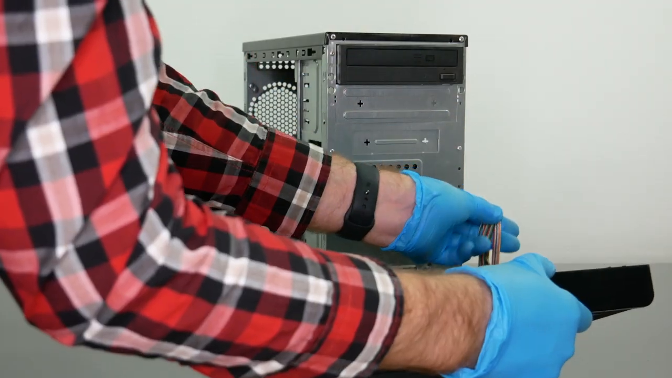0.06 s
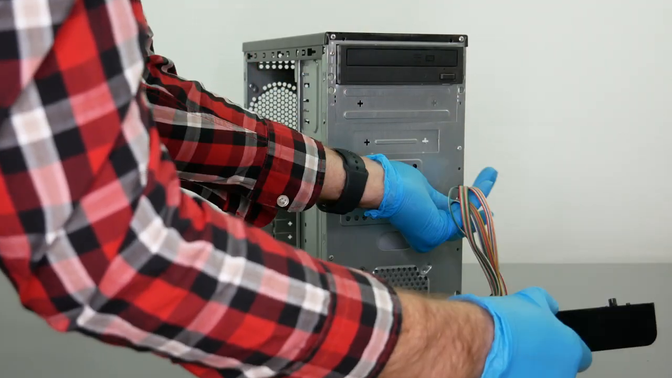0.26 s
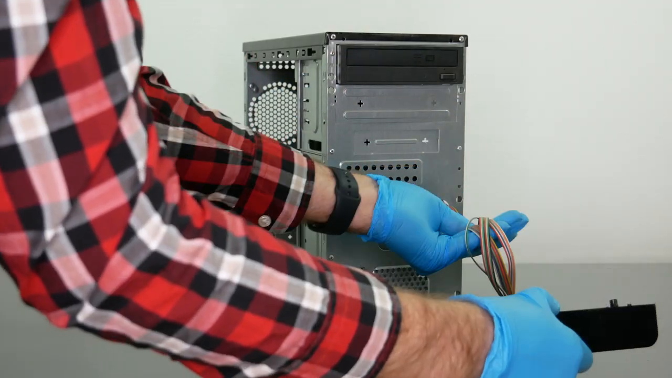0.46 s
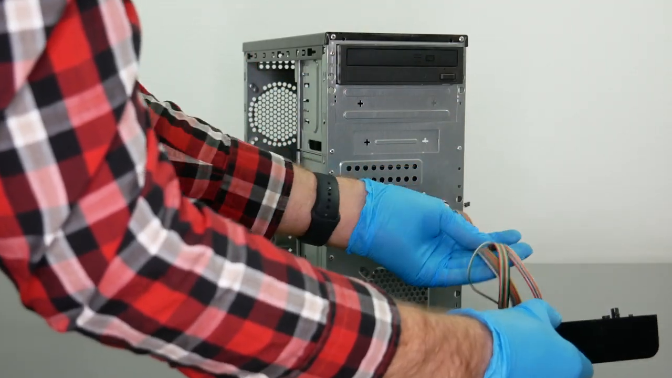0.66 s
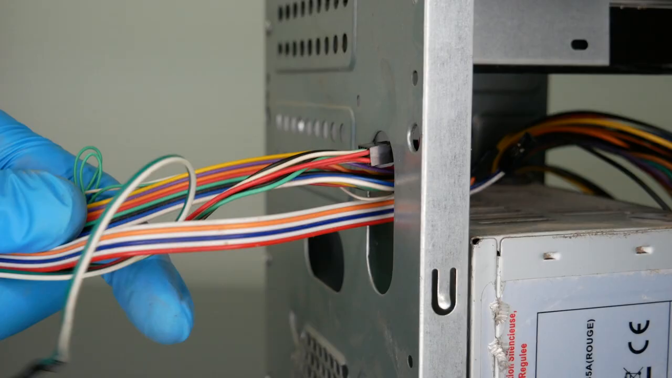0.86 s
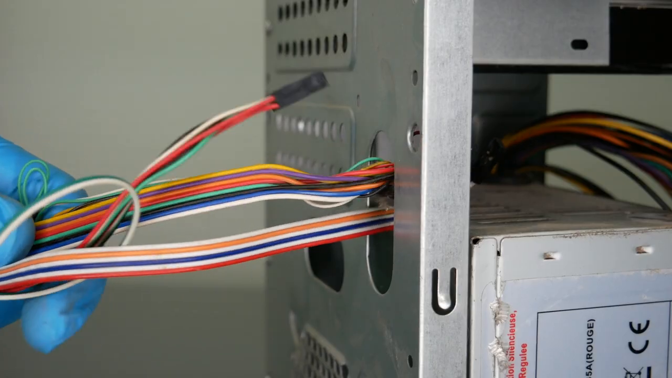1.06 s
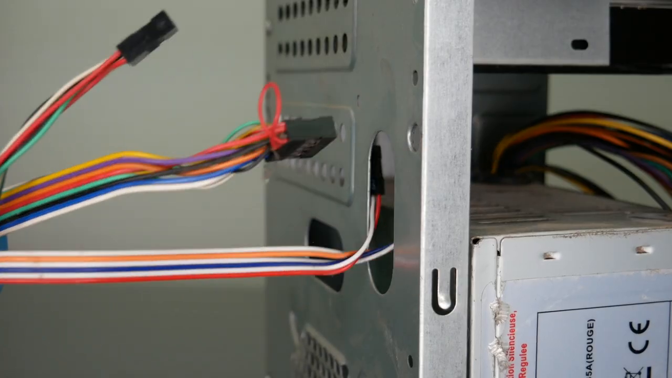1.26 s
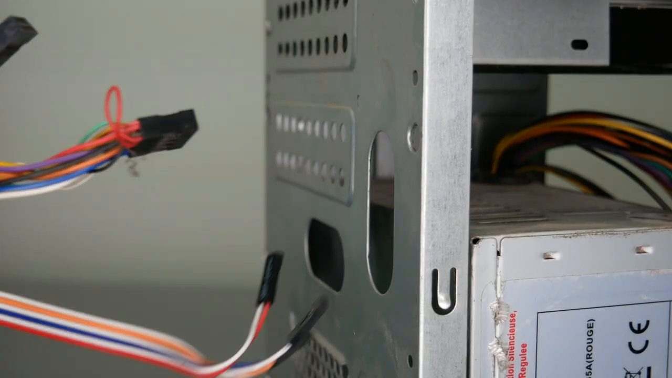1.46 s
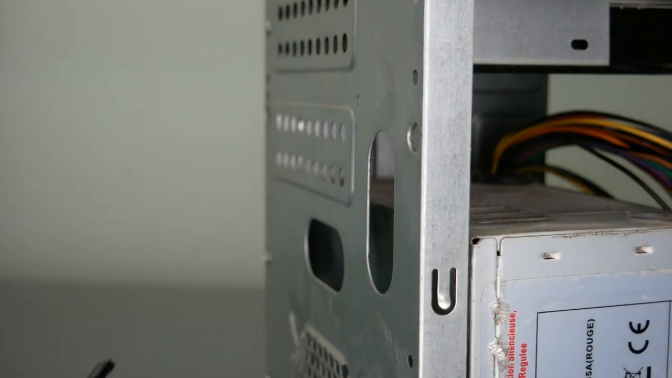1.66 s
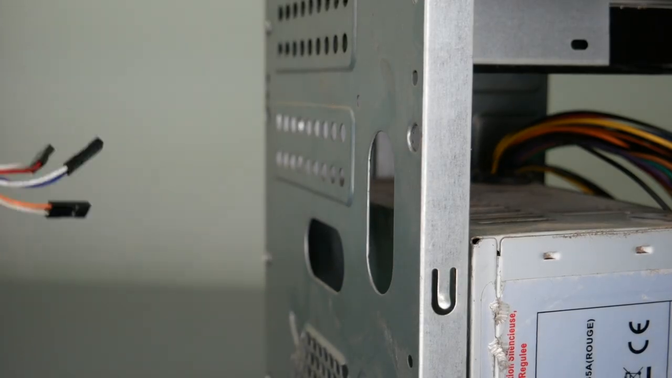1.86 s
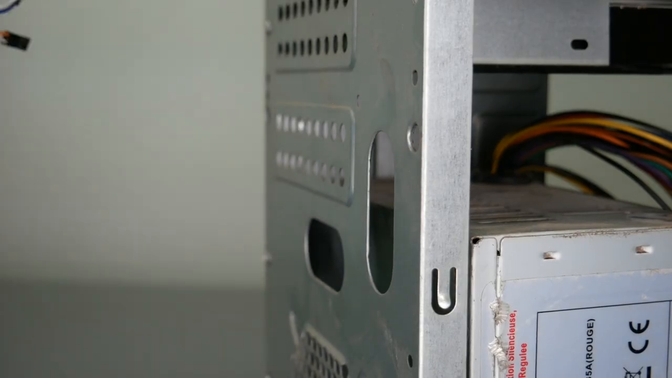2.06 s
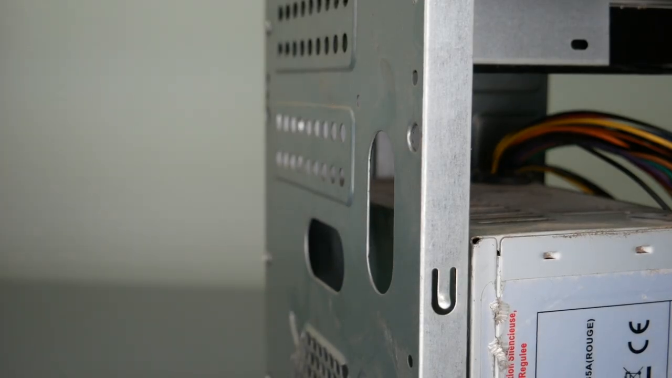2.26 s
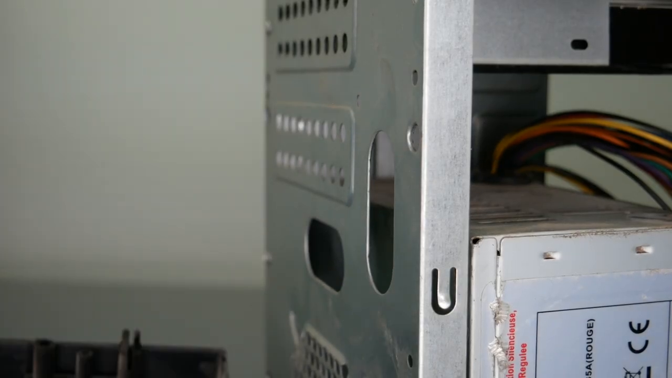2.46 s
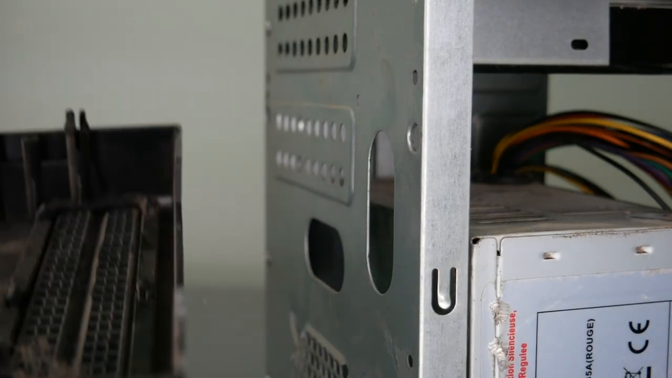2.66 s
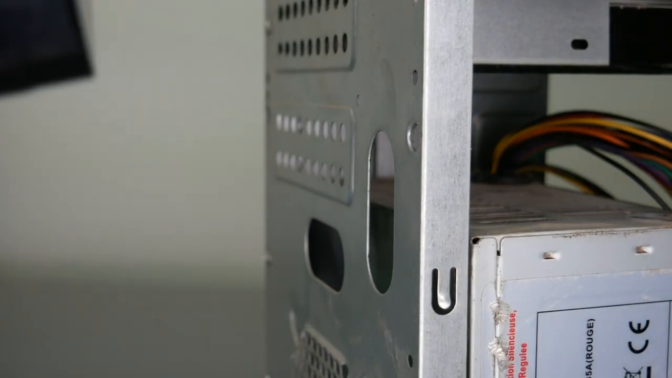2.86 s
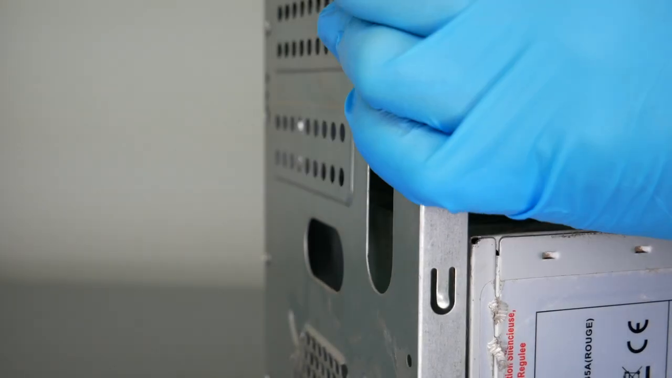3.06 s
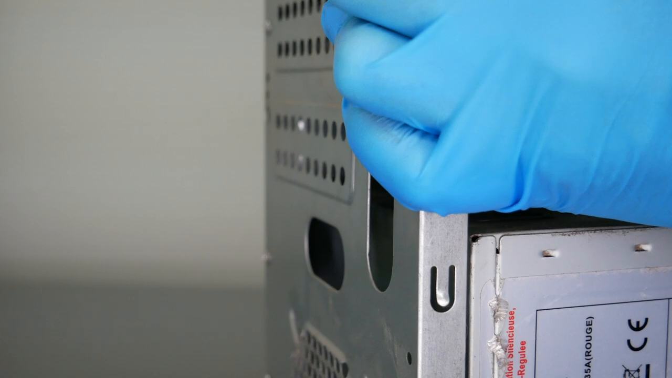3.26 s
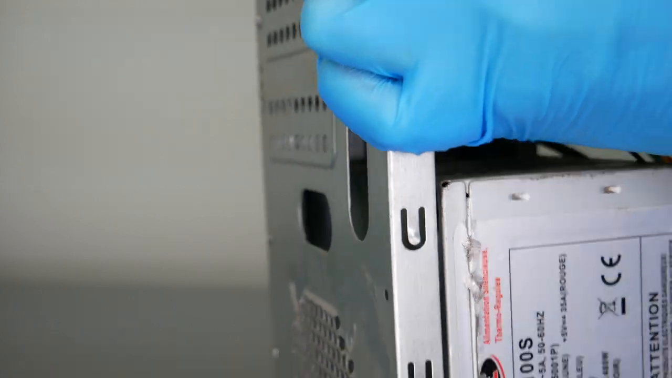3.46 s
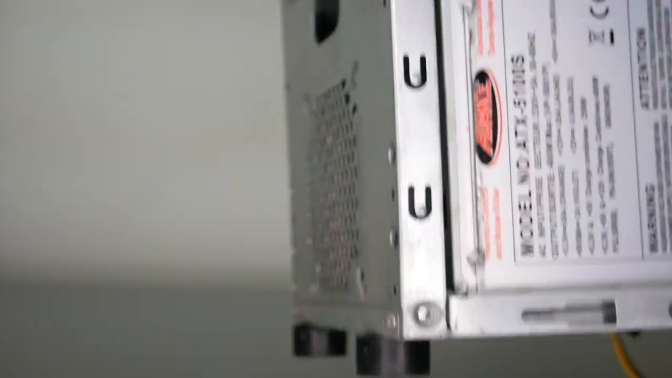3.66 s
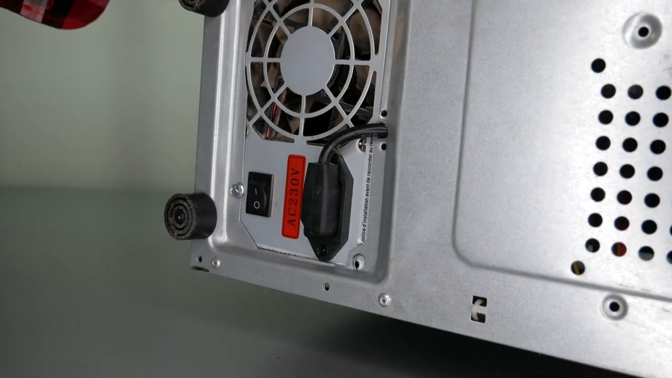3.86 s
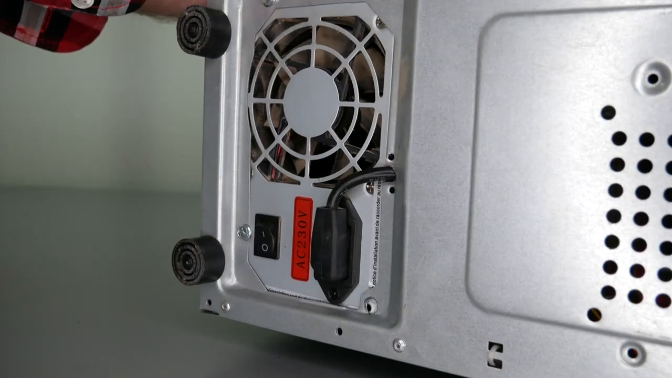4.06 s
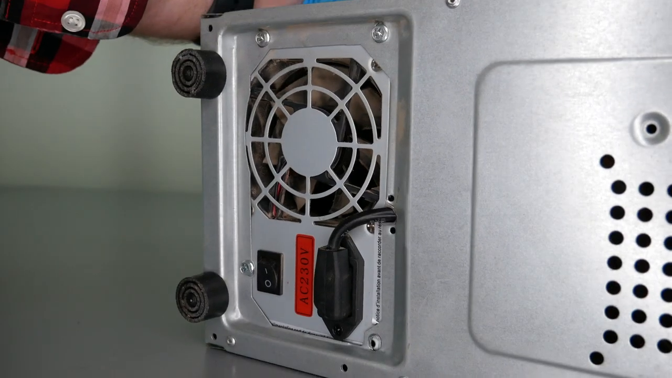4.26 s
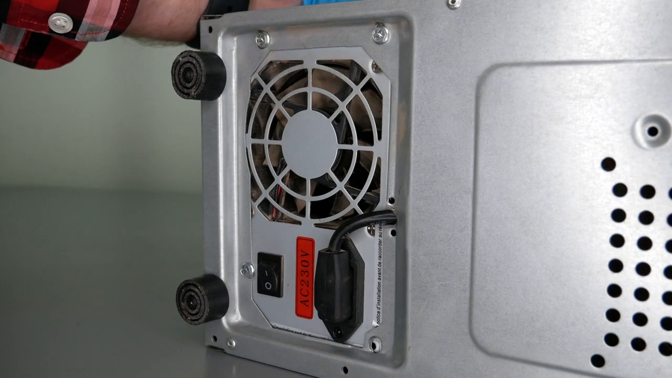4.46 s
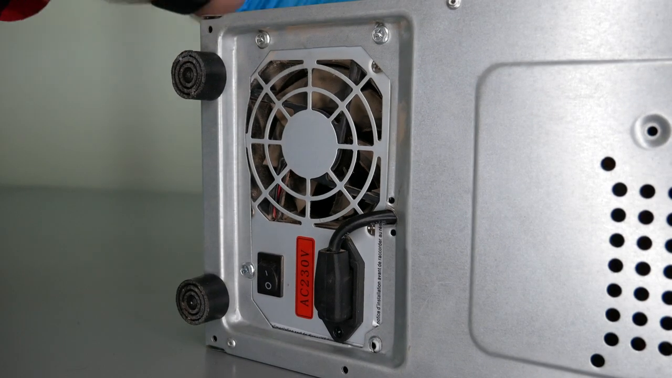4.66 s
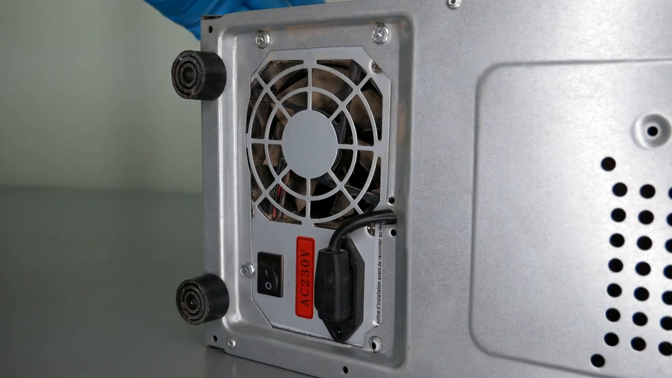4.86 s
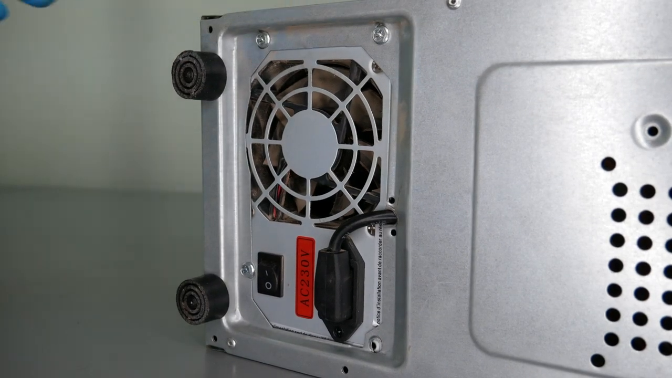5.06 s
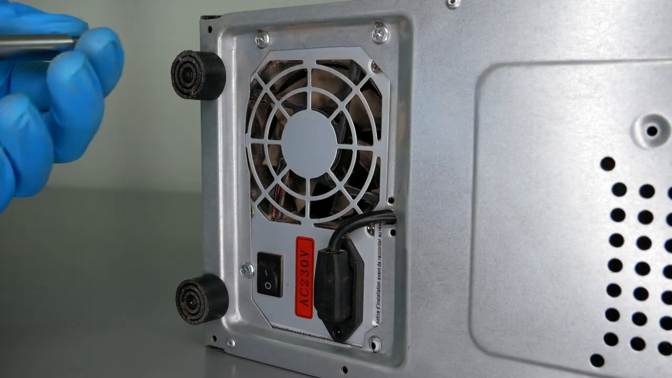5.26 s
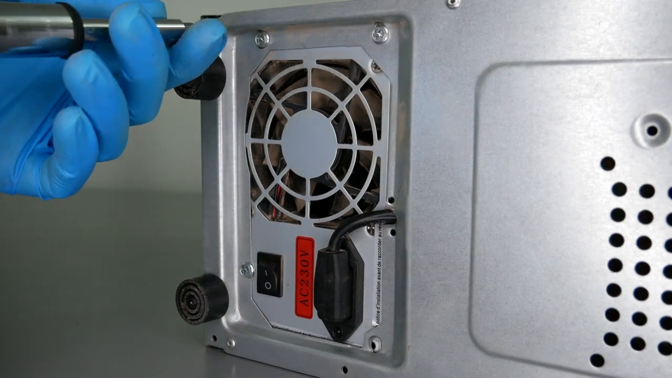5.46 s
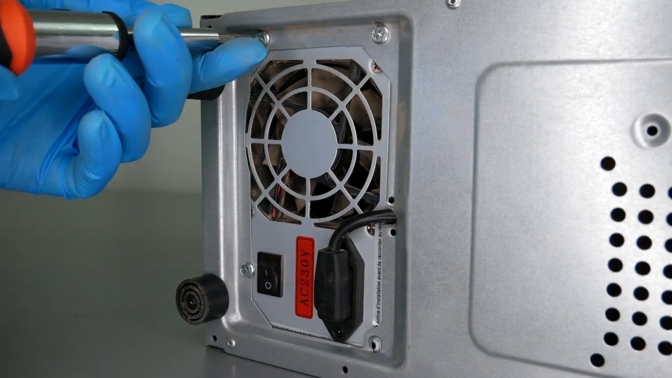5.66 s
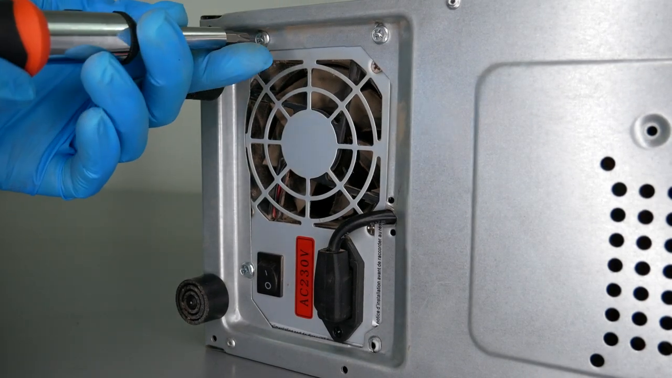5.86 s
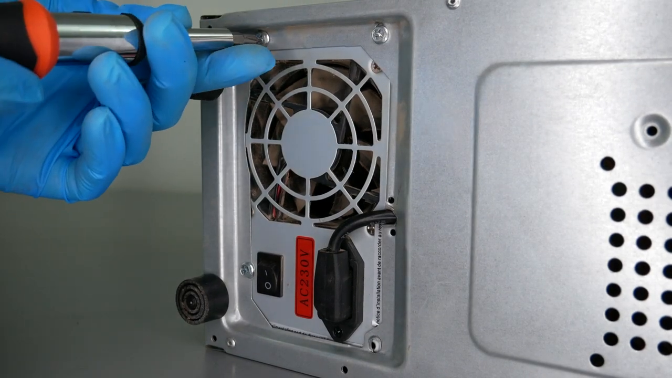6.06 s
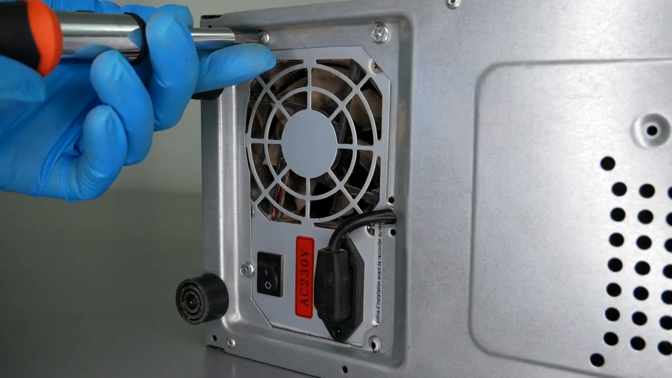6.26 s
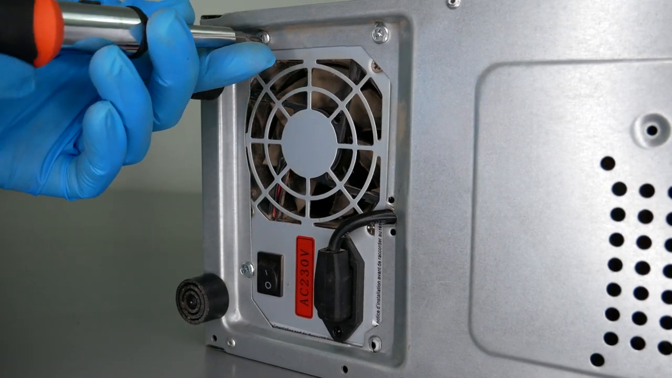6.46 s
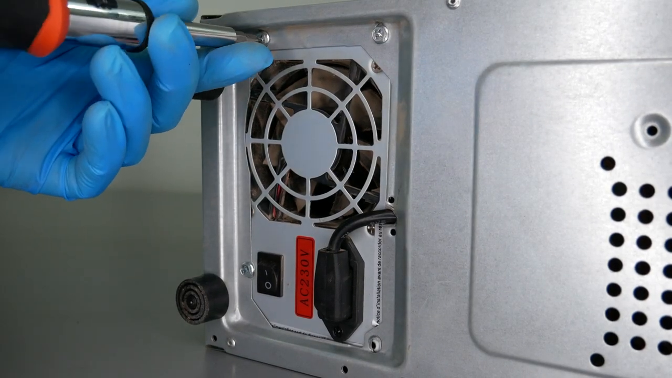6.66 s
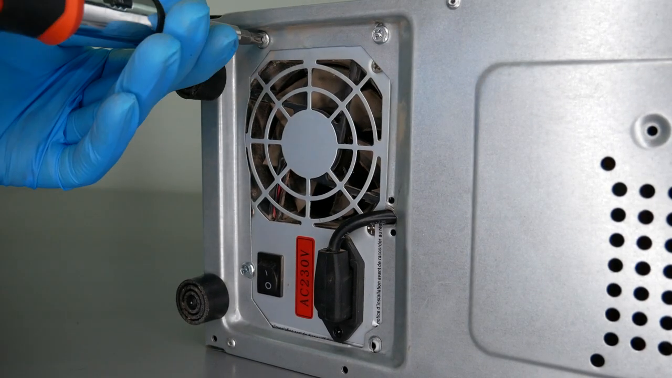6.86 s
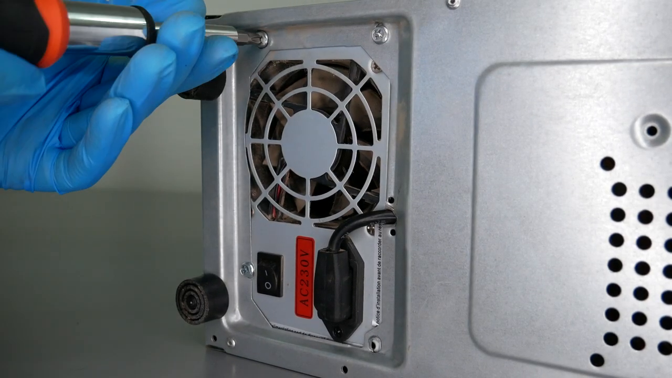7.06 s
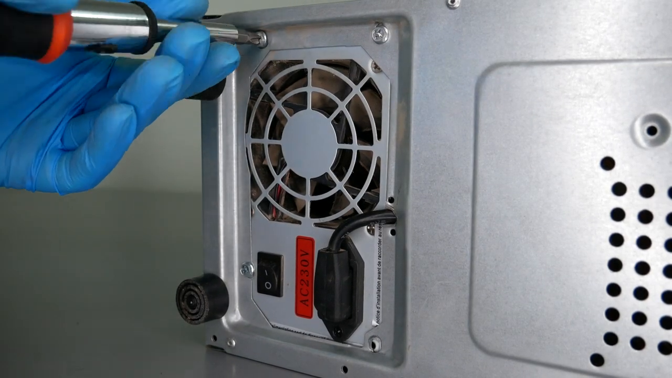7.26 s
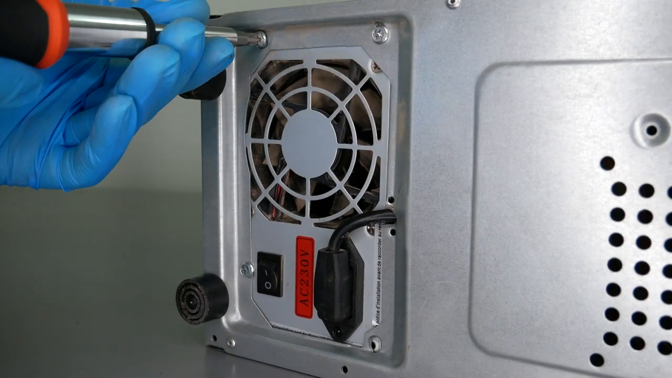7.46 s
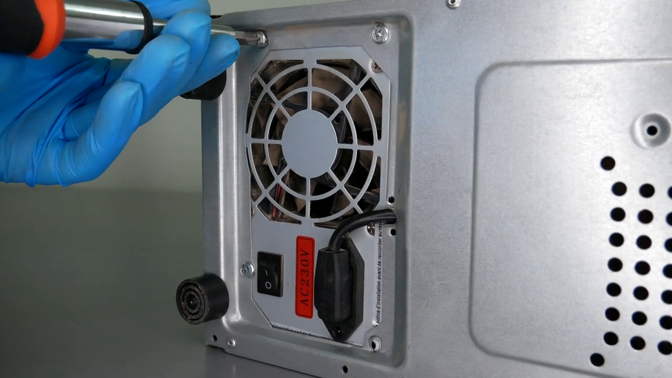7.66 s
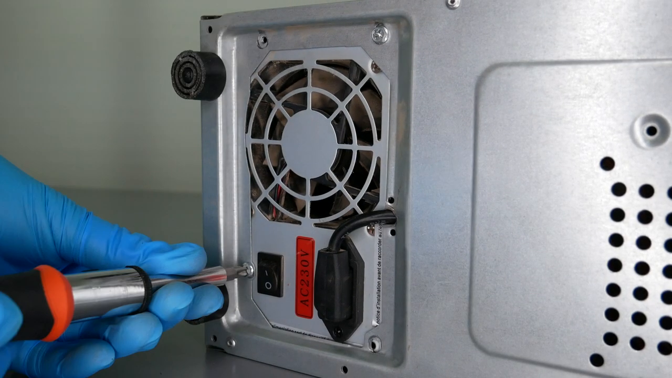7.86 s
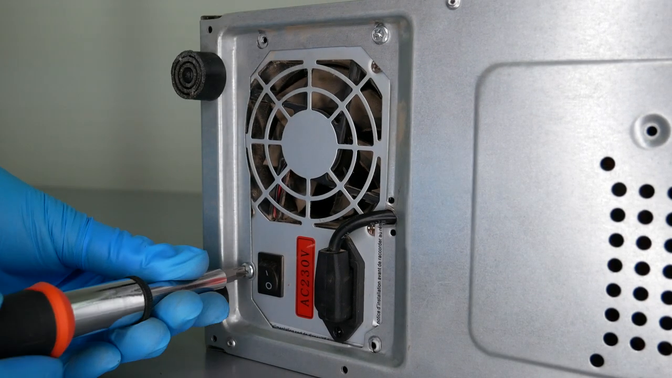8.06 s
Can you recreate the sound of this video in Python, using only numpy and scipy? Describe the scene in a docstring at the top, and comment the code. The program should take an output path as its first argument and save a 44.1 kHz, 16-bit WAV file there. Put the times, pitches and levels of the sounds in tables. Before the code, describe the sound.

Wires and plugs scrape and clatter through a thin steel computer case, which thuds down and rocks, then a screwdriver rasps and ticks over low hum.

```python
"""At a table, a steel computer case is worked on. Wires drag through it in tiny random slips, and plugs clatter
as bursts of contacts that ring the sheet. Blows ring the case's low panels, rubber squeaks in gliding tones, and
the case skids and rocks in a slow sway. Then a screwdriver turns with gritty rasps, sharp ticks and a grinding
shaft. Mains hum is made of sine tones; hiss, swishes and a low murmur are shaped noise."""
import sys
import numpy as np
from scipy import signal
from scipy.fft import rfft, irfft, next_fast_len
from scipy.io import wavfile
from scipy.ndimage import uniform_filter1d, map_coordinates

SR = 44100
rng = np.random.default_rng(int(sys.argv[2]) if len(sys.argv) > 2 else 0)


def wav_record(signal):
    """Record a signal, one row per channel, as 16-bit PCM in the file named by sys.argv[1]."""
    frames = np.transpose(np.atleast_2d(signal))
    bounded = np.clip(frames, -1, 1)
    # unit amplitude maps onto the largest positive 16-bit level
    quanta = np.round(bounded * 32767).astype(np.int16)
    wavfile.write(sys.argv[1], SR, quanta)


N = 358091

# screwdriver turns: start_s, length_s (how fast the rasp fades), level_db (relative)
TURNS = [(6.855, 0.078, -30), (7.034, 0.029, -28), (7.21, 0.024, -31), (7.3584, 0.032, -27.5),
         (7.504, 0.031, -26.5), (7.665, 0.03, -30), (7.812, 0.015, -24.5), (7.898, 0.025, -23.5),
         (8.055, 0.034, -29)]


def amp(db):
    """Turn decibels into gain."""
    return 10 ** (np.asarray(db) / 20)


def unit(x):
    """Scale to an rms of 1."""
    return x / np.sqrt(np.mean(x ** 2) + 1e-20)


def along(points, hz):
    """Read a curve of (Hz, value) points on a log frequency axis."""
    point_hz, values = np.transpose(points)
    return np.interp(np.log(hz + 1), np.log(point_hz + 1), values)


def wobble(rate):
    """A smooth random curve with this many random points a second."""
    points = rng.standard_normal(int(N * rate / SR) + 4)
    return map_coordinates(points, [np.arange(N) * rate / SR])


def filtered(x, response):
    """Multiply the spectrum of x by a complex response of frequency."""
    size = 2 * next_fast_len(x.shape[-1] // 2 + 4096)
    spectrum = rfft(x, size) * response(np.fft.rfftfreq(size, 1 / SR))
    return irfft(spectrum, size)[..., :x.shape[-1]]


def coloured(x, spectrum):
    """Filter with a (Hz, dB) shape of unit power, with no sound before its cause."""
    def response(hz):
        shape = unit(amp(along(spectrum, hz)))
        # folding the cepstrum forward makes the filter causal
        cepstrum = irfft(np.log(shape + 1e-6))
        half = len(cepstrum) // 2
        cepstrum[1:half] *= 2
        cepstrum[half + 1:] = 0
        return np.exp(rfft(cepstrum))
    return filtered(x, response)


def resonate(x, peaks):
    """Pass x through resonances of (pitch Hz, width Hz, dB), with alternating signs."""
    def response(hz):
        total = 0
        for k, (centre, width, db) in enumerate(peaks):
            drag = 1j * hz * width
            total = total + (-1) ** k * amp(db) * drag / (centre * centre - hz * hz + drag)
        return total
    return filtered(x, response)


def ring(t60, direct):
    """A contact, then a dense ring; the two together have unit energy, and the high treble dies first."""
    # how long each pitch rings: pitch_hz, relative ring time (a ratio)
    damping = [(150, 0.83), (700, 0.87), (2500, 0.9), (12000, 0.6)]
    hz, t, noise = signal.stft(rng.standard_normal(SR * 3 // 4), SR, nperseg=256)
    ring_s = max(t60, .02) * along(damping, hz)[:, None]
    tail = signal.istft(noise * amp(-60 * t / ring_s), SR, nperseg=256)[1]
    tail /= np.linalg.norm(tail)
    tail[0] += direct
    return tail / np.hypot(1, direct)


def grains(size, rate, spread_db):
    """Tiny slips of random size and sign at random moments, rate a second."""
    happens = rng.random(size) < rate / SR
    return happens * amp(spread_db * rng.standard_normal(size)) * rng.choice([-1, 1], size)


def note(db, hz, t60, split=0.037):
    """Seven close tones that beat together as they die; split is their relative spacing."""
    t = np.arange(SR // 2) / SR
    steps = np.arange(-3, 4) + rng.uniform(-.4, .4, size=7)
    phases = 2 * np.pi * (hz * (1 + split * steps[:, None]) * t + rng.random((7, 1)))
    cluster = unit(amp(-3 * np.abs(steps)) @ np.sin(phases))
    return amp(db - 60 * t / t60) * (1 - np.exp(-t / 0.0023)) * cluster


def strokes(rows, attack, release_db_per_s, sag_db_per_s=0):
    """Gain of (start s, length s, dB) movements: each rises, sags while it lasts, then dies away."""
    t, power = np.arange(N) / SR, np.zeros(N)
    for s, length, db in rows:
        age = np.maximum(t - s, 0)
        fall_db = sag_db_per_s * np.minimum(age, length) + release_db_per_s * np.maximum(age - length, 0)
        power += (np.minimum(age / attack, 1) * amp(db - fall_db)) ** 2
    return np.sqrt(power)


def add(track, s, sound):
    """Mix a sound in at s seconds."""
    start = max(0, round(s * SR))
    track[start:start + len(sound)] += sound[:len(track) - start]


def steel(x, t60, direct, modes_db):
    """Contacts make the perforated sheet ring, both densely and at its own pitches."""
    # overall tone of wires on steel: pitch_hz, level_db (relative)
    wire_tone = [(59, -23.5), (100, 1.5), (181, -13), (358, -0.5), (580, -1.5), (950, 3), (1870, -4.5),
                 (2800, -4.5), (3750, -6), (4100, -8.5), (7140, -19), (10900, -24.5), (14700, -30.5),
                 (16000, -40.5)]
    # resonances of the perforated sheet: pitch_hz, width_hz, level_db (relative)
    sheet = [(1010, 300, 4.5), (1326, 42, 12.5), (1600, 19, 1.5), (2240, 37, 3), (2705, 46, 5),
             (3260, 31, 4), (3414, 72, 10), (3700, 100, 8.5), (3760, 15, 14), (4717, 28, -8.5),
             (5320, 65, 4.5), (5750, 37, 3.5)]
    x = signal.fftconvolve(x, ring(t60, direct))[:len(x)]
    return coloured(x, wire_tone) + amp(modes_db) * resonate(x, sheet)


def scrapes():
    """Wires and gloves stick and slip on the sheet; the tipping case skids with a judder."""
    # pulls of the wire bundle through the case: start_s, length_s, level_db
    pulls = [(-.02, 0.017, -21.5), (.12, 0.16, -46), (.27, 0.14, -31.5), (.42, 0.17, -24.5),
             (.64, 0.046, -20), (.68, .12, -26.5), (.79, .08, -33.5), (.95, 0.032, -33.5),
             (1.05, 0.21, -36.5), (1.22, 0.17, -38), (1.46, 0.051, -33), (1.77, 0.067, -45.5)]
    # gloves shifting their grip on the steel: start_s, length_s, level_db
    grips = [(3.3, 0.36, -45.5), (3.68, 0.14, -37.5)]
    # the case skids as it tips: start_s, length_s, level_db
    skids = [(3.4, 0.52, -51), (3.83, 0.12, -32.5)]
    # tone of the skid: pitch_hz, level_db (relative)
    skid_tone = [(150, -15), (400, -2), (700, 3), (1100, 6), (1500, -1), (1900, -8.5), (2600, -10),
                 (4000, -17), (8000, -29), (15000, -39)]
    # the skidding foot's resonance: pitch_hz, width_hz, level_db (relative)
    foot = (1900, 380, 3.3)
    foot_from_s, foot_rise_s = 3.83, 0.041  # it comes in as the foot takes the weight

    slips = unit(grains(N, rate=2500, spread_db=3) * amp(2.5 * wobble(45)))
    rubbing = unit(steel(slips, t60=0.3, direct=0.22, modes_db=-10.5))
    skid_slips = signal.fftconvolve(grains(N, rate=3000, spread_db=3), ring(.2, direct=.6))[:N]
    skid = unit(coloured(skid_slips, skid_tone))
    weight = np.clip((np.arange(N) / SR - foot_from_s) / foot_rise_s, 0, 1)
    juddering = unit((skid + resonate(skid, [foot])) * amp(1.9 * wobble(160)))
    skid = (1 - weight) * skid + weight * juddering
    sliding = strokes(pulls, attack=0.014, release_db_per_s=158.5)
    sliding = sliding + strokes(grips, attack=0.037, release_db_per_s=350)
    return rubbing * sliding + skid * strokes(skids, attack=0.015, release_db_per_s=110)


def clacks(rise=0.0039, sharpness=6):
    """Each plug hits the sheet once, chatters on in a short burst of contacts and rings at its own pitch."""
    # plugs and loose edges hitting the sheet (levels relative, ring_s before damping):
    # start_s, level_db, treble_db, pitch_hz, rattle_s (at least 2 ms is used), ring_s
    hits = [(0.272, 8, 4.5, 3630, 0.0043, 0.28), (0.348, -9, 13.5, 3500, .002, .1),
            (0.38, 7.5, 8, 890, 0.0043, 0.29), (0.401, 9, 11, 3500, 0.029, .2),
            (0.415, 21.5, 16.5, 3990, 0.012, .3), (.446, 12, 10, 2764, .014, .28),
            (0.566, 10, 3, 2410, 0.021, 0.46), (0.635, 18, 8.5, 1010, 0.024, 0.34),
            (0.661, 19.5, 13, 3300, 0.0097, 0.5), (0.714, 18, 6, 3810, 0.0094, 0.24),
            (0.743, 18.5, 7.5, 3050, 0.009, 0.39), (0.944, 0.5, -9, 1280, 0.031, 0.51),
            (1.137, 10, 16.5, 2400, 0.014, 0.31), (1.218, 10, 2.5, 1080, 0.03, 0.71),
            (1.281, 15.5, 3.5, 2850, 0.014, 0.36), (1.361, 5, 12, 2750, .003, 0.28),
            (1.384, 4, 6.5, 2680, 0.008, 0.22), (1.407, 2.5, 4, 2650, 0.0089, 0.25),
            (1.449, 6, 10, 2830, 0.0053, .15), (1.457, 6, 1.5, 2770, 0.035, 0.22),
            (1.539, -3.5, -1, 5230, 0.005, 0.283), (2.043, -21, 0, 4210, 0.0054, .2),
            (2.09, -15.5, -1, 955, 0.0074, .3), (3.248, -21, -5, 2000, 0.0046, 0.44),
            (3.305, 14.5, 20, 3220, 0.0029, 0.288), (3.38, -1, 25, 3280, 0.004, 0.18),
            (3.404, -6.5, 2, 1110, 0.015, 0.23), (3.575, -1.5, 13.5, 1410, 0.0052, 0.19),
            (3.696, -11, 6, 780, 0.028, .3), (4.024, 3.5, 7.5, 1460, 0.0017, 0.29),
            (4.053, -8, 13, 900, .015, 0.23), (4.105, -7.5, 4, 1276, 0.0073, 0.18),
            (4.253, -3, 0, 1970, 0.0018, .3), (4.349, 10, 9, 3700, 0.0039, 0.079),
            (4.358, 2.5, -5, 5290, 0.0019, 0.2), (5.372, -25.5, -7, 3760, 0.0025, 0.32),
            (6.229, -24.5, -8, 2970, 0.013, 0.25)]
    # a plug's own ring: pitch ratio, level_db (relative), ring_s (time to fall 60 dB)
    plug_modes = [(1, -9.5, 0.067), (1.309, -8, 0.04), (1.83, -14, 0.027)]
    # resonance against the hit; plug ring and first hard contact against the chatter
    resonance_db, plug_db, contact_db = 2, -31, -14.5

    out, t = np.zeros(N), np.arange(SR // 2) / SR
    for s, db, treble_db, hz, length, ring_s in hits:
        slips = grains(len(t), rate=4000, spread_db=2.5)
        chatter = slips * np.exp(-t / max(length, .002)) * (1 - np.exp(-t / rise))
        chatter /= np.linalg.norm(chatter)
        add(chatter, rise, [amp(contact_db)])
        chatter /= np.linalg.norm(chatter)
        hit = steel(chatter, t60=ring_s, direct=0.97, modes_db=-11.5)
        hit = hit + amp(resonance_db) * resonate(hit, [(hz, hz / sharpness, 0)])
        for ratio, level, t60 in plug_modes:
            add(hit, rise, note(plug_db + level, hz * ratio, t60, split=0.015))
        tone = [(300, -11.0), (3000, 2.0), (11000, treble_db)]
        add(out, s, amp(db) * coloured(hit, tone))
    return out


def squeaks(waver=0.04, flutter_db=4):
    """Rubber sticks and slips: a rough, wavering note, in places gliding, that swells and fades."""
    # rubber gloves and feet on steel and table: start_s, length_s, level_db, pitch_hz, glide (octaves)
    rubs = [(1.78, .11, -62, 4500, 0), (1.85, .06, -57, 2820, 0), (3.69, 0.064, -50, 880, 0.063),
            (3.748, .1, -44, 1060, .08), (3.835, 0.09, -37, 1400, 0.35), (3.89, 0.12, -41, 1650, .2),
            (3.88, .13, -41, 760, .2), (3.86, .12, -49, 2500, .15)]
    out = np.zeros(N)
    for s, length, db, hz, glide in rubs:
        u = np.linspace(0, 1, int(length * SR))
        pitch = hz * 2 ** (glide * (u - .5)) * (1 + waver * wobble(302)[:len(u)])
        flutter = amp(flutter_db * np.tanh(wobble(140)[:len(u)]))
        tone = unit(np.sin(2 * np.pi * np.cumsum(pitch) / SR) * flutter)
        add(out, s, amp(db) * np.sin(np.pi * u) * tone)
    return signal.fftconvolve(out, ring(0.1, direct=1.4))[:N]


def singing():
    """Noise drives the low panel notes, which sing under the wires and as the case rocks."""
    # when the panels sing: start_s, length_s, level_db
    spans = [(-0.025, 1.74, -39), (4.48, 0.2, -43)]
    # the notes kept alive: pitch_hz, width_hz, level_db (relative)
    panel_notes = [(139.1, 5.5, 3), (254.5, 15, 0.5), (360, 16, 0), (568, 23, -4.5)]
    sound = unit(resonate(rng.standard_normal(N), panel_notes))
    return sound * strokes(spans, attack=.03, release_db_per_s=118, sag_db_per_s=6.0)


def knocks(push=0.78, wash=0.97):
    """A blow pushes the panel once, then its low modes and a thin wash of higher ones ring on."""
    # blows on case and table (levels relative, ring_s before damping):
    # start_s, level_db, bass_db, middle_db, treble_db, ring_s
    blows = [(.272, 3, 4.5, 21, -53, 0.38), (1.227, 3.5, -3.5, -6, -32, 0.32),
             (1.256, -4, -3, -8, -27, 0.35), (2.133, 8.5, -1, -7.5, -25.5, 0.41),
             (4.025, 16.5, 10, -10.5, -25, 0.65), (4.2546, 7.5, 7.5, 1, -24.5, 0.27),
             (4.259, 11.5, 10.5, -7, -27, 0.65), (4.351, 6.5, 8, -9, -9.5, 0.25),
             (4.362, 5, 9.5, -11.5, -22, 0.29), (5.208, -9.5, -2.5, -7, -29.5, .21),
             (6.242, -7.5, 11, -14, -29, 1)]
    # the case's panels: pitch_hz, level_db (relative), ring_s (the blow's ring_s is used if shorter)
    body = [(134.3, 1, 0.38), (167.8, -5.5, 0.41), (216.4, -0.5, 0.36), (255.8, 0.5, 0.55),
            (315.5, -8.5, 0.88), (332, 4.5, 0.18), (377, -4.5, 0.25), (451, -2.5, 0.21), (570, -7, 0.133),
            (643, -25.5, 0.33), (855, -14.5, 0.047), (930, -17, 0.41), (1060, -16.5, 0.31)]
    # tone of the dense ring against the push: pitch_hz, level_db (relative)
    wash_tone = [(100, -19.5), (240, -2), (450, -1.5), (1000, 1), (1800, -1.5), (5000, 2.5)]
    panels_db = -43.5  # the low modes also grow with a blow's level and bass

    out = np.zeros(N)
    for s, db, bass_db, middle_db, treble_db, t60 in blows:
        tone = [(30, -22.0), (85, bass_db - 31.5), (250, bass_db), (480, 2.5), (1100, middle_db),
                (3000, treble_db), (7000, treble_db - 13.0), (15000, treble_db - 29.5)]
        force = wash * coloured(ring(t60, direct=0), wash_tone)
        force[0] += push
        t = np.arange(len(force)) / SR
        panels = np.zeros(len(t))
        for hz, level, life in body:
            fading = amp(level + rng.normal(0, 2.1) - 60 * t / min(life, t60))
            panels += fading * np.sin(2 * np.pi * hz * t + rng.uniform(0, 2 * np.pi))
        panels *= amp(bass_db + panels_db) * (1 - np.exp(-t / 0.0012))
        add(out, s, amp(db) * (coloured(force, tone) + panels))
    return out


def taps():
    """Single notes of the panels and table woken by contacts; one contact may wake several."""
    # the notes: start_s, level_db, pitch_hz, ring_s (time to fall 60 dB)
    woken_notes = [(0.273, -23, 111, 0.19), (.972, -32, 1100, 0.206), (2.137, -28.5, 84.7, 0.313),
                   (2.448, -35, 990, 0.11), (4.352, -11.5, 70.5, 0.17), (4.358, -10.5, 137.7, 0.17),
                   (4.354, -11, 562, 0.055), (4.178, -29, 930, 0.093), (5.21, -33.5, 478, 0.21),
                   (5.7, -51.5, 2230, 0.068), (5.82, -59, 2400, 0.034), (5.918, -48, 2360, 0.032),
                   (6.241, -38.5, 827, 0.27), (6.241, -39.5, 542, 0.39), (6.241, -33.5, 142, 0.57),
                   (7.165, -23, 560, 0.081), (7.165, -31.5, 1050, .09), (7.165, -31, 1500, 0.072),
                   (7.777, -31, 3230, 0.051)]
    out = np.zeros(N)
    for s, db, hz, t60 in woken_notes:
        add(out, s, note(db, hz, t60))
    return out


def rocking():
    """The landed case sways on its rubber feet; handling rumbles through the table."""
    # jolts that set the case rocking on its feet: start_s, length_s, level_db
    jolts = [(4.06, 0.2, -11.5), (4.33, 0.19, -6), (4.64, 0.44, -17.5)]
    # hands leaning on the case and table: start_s, length_s, level_db
    leans = [(-.1, 0.68, -35.5), (1.1, 0.49, -39.5), (1.6, 0.77, -43.5), (3.02, 0.68, -36),
             (3.42, 0.055, -28.5), (3.8, 0.22, -55), (4.33, 0.44, -33.5), (6.85, 0.43, -40),
             (7.7, 0.17, -34.5)]
    # the sway is near 28.6 Hz and drifts a little
    phase = 2 * np.pi * np.cumsum(28.6 * (1 + .015 * wobble(5))) / SR
    rumble_tone = [(12, 12.0), (30, 12.5), (50, -15.5), (82, -8.5), (140, -15.5), (250, -18.0), (1000, -69.0)]
    rumble = unit(coloured(rng.standard_normal(N), rumble_tone))
    sway = strokes(jolts, attack=0.081, release_db_per_s=169, sag_db_per_s=32.5)
    leaning = strokes(leans, attack=0.039, release_db_per_s=40.5, sag_db_per_s=-2)
    return unit(np.sin(phase)) * sway + rumble * leaning


def screwdriver(lead=0.014, slack_db=-5, rasp_db=-1.0):
    """Each turn takes up its slack with a rasp and catches in sharp ticks; lighter strokes rasp in between."""
    # the screwdriver's catches, a few to each turn: start_s, level_db (relative)
    catches = [(6.8627, -6), (6.8706, -13), (6.8816, -10), (6.8887, -18), (6.903, -16), (7.0312, -6.5),
               (7.04, -18), (7.0465, -12), (7.054, -8.5), (7.0614, -11), (7.2128, -7.5), (7.218, -13.5),
               (7.2275, -14), (7.2348, -11), (7.283, -12), (7.358, -5), (7.365, -8), (7.3724, -14),
               (7.38, -9.5), (7.5033, -9), (7.507, -10.5), (7.5122, -10), (7.5304, -12), (7.619, -23),
               (7.655, -9), (7.6587, -8), (7.6676, -6.5), (7.679, -15), (7.689, -13), (7.81, -14),
               (7.818, -8.5), (7.822, -14), (7.83, -9), (7.8398, -6), (7.8483, -14), (7.893, -6),
               (7.9003, -8.5), (7.916, -14), (7.9314, -11), (8.0472, -7), (8.051, -7), (8.0578, -8),
               (8.069, -18), (8.0788, -12)]
    # lighter strokes between the turns: start_s, level_db (relative), length_s (how fast the rasp fades)
    returns = [(7.107, -30, 0.009), (7.172, -29.5, 0.0065), (7.285, -27, 0.018), (7.609, -33, 0.019),
               (7.767, -36, .008), (7.979, -29.5, 0.0091), (8.031, -30, 0.017)]
    # each lighter stroke rings the rear panel: level_db, pitch_hz, ring_s
    return_note = (-40, 571, 0.49)
    # tone of the rasp: pitch_hz, level_db (relative)
    rasp_tone = [(290, -28.5), (500, -22.5), (570, -3.5), (761, -31.5), (1250, -8), (1550, -13.5),
                 (1720, -5), (2610, -17.5), (3250, -12.5), (3750, -22.5), (4280, -9), (5400, -11.5),
                 (7310, -18.5), (13800, -12.5), (16000, -13)]
    # the screw and rear panel ring under the tip: pitch_hz, width_hz, level_db (relative)
    tool_modes = [(1025, 28, -8), (1220, 31, 6.5), (1403, 19, 7.5), (1676, 160, 2), (2086, 62, -1),
                  (2110, 42, 4), (3260, 100, 3), (4210, 56, -1), (4370, 32, -1), (5000, 63, 2),
                  (5530, 58, -3)]
    # tone of the grinding shaft: pitch_hz, level_db (relative)
    shaft_tone = [(150, -28), (250, -1), (298, -21), (407, -4), (484, -29), (566, -8), (748, -6.5),
                  (1240, -3.5), (2490, -13), (3230, -9.5), (3770, -19), (4260, -18), (16000, -17)]
    # the case murmurs under the screwdriver: pitch_hz, width_hz, level_db (relative)
    drone_modes = [(76, 21, 21), (120, 13.5, 24.5), (210, 22, 7.5), (392, 21, 7.5), (576, 17, 11)]
    tick_db, tool_ring_db, shaft_db, drone_db = 4, 4.5, -39.5, -35.5
    # the tip seats anew at each stroke: centre, scatter and strength of its ring
    seat_hz, seat_octaves, seat_db = 2306, 0.58, -8

    ticks, rasp, panel = np.zeros(N), np.zeros(N), np.zeros(N)
    t = np.arange(SR // 4) / SR

    def rasping(length):
        """One stroke of fine metal grit."""
        taking_up = amp(slack_db) * np.clip(3 * t / lead, 0, 1)
        stroke = np.where(t < lead, taking_up, np.exp(-((t - lead) / length) ** 2))
        grit = grains(len(t), rate=4000, spread_db=3.5)
        hz = seat_hz * 2 ** rng.normal(0, seat_octaves)
        return stroke * unit(grit + amp(seat_db) * resonate(grit, [(hz, hz / 5, 0)]))

    for s, db in catches:
        add(ticks, s, amp(tick_db + db) * catch())
    for s, length, db in TURNS:
        add(rasp, s - lead, amp(db) * rasping(length))
    for s, db, length in returns:
        add(rasp, s - lead, amp(db) * rasping(length))
        add(panel, s, note(*return_note, split=0.0128))
    contact = ticks + amp(rasp_db) * coloured(rasp, rasp_tone)
    contact = contact + amp(tool_ring_db) * resonate(contact, tool_modes)
    contact = signal.fftconvolve(contact, ring(.12, direct=2))[:N]  # a short room ring
    slips = grains(N, rate=2000, spread_db=3) * amp(2.5 * wobble(40))
    shaft = unit(coloured(signal.fftconvolve(slips, ring(0.13, direct=0.96))[:N], shaft_tone))
    drone = unit(coloured(resonate(rng.standard_normal(N), drone_modes), [(600, -11), (2000, -20.5)]))
    return contact + panel + amp(shaft_db) * shaft * turning() + amp(drone_db) * drone * working()


def catch():
    """One catch of the screwdriver, of peak 1: a bright snap and a very short, high ring."""
    # the catch's hard little edge rings: pitch_hz (varied a little), decay_s, size against the snap (a ratio)
    edge_ring = (13200, 0.0004, 0.75)
    # tone of the bright snap: pitch_hz, level_db (relative)
    snap_tone = [(1000, -13.5), (2000, -8), (4000, -6.5), (7000, -2.5), (13500, 2), (16000, 2.5)]
    hz, decay, share = edge_ring
    t = np.arange(256) / SR
    snap = coloured(rng.choice([-1, 1], size=len(t)) * np.exp(-t / .0004), snap_tone)
    edge = np.sin(2 * np.pi * hz * (1 + .06 * rng.standard_normal()) * t) * np.exp(-t / decay)
    tick = snap / np.abs(snap).max() + share * edge
    return tick / np.abs(tick).max()


def turning(hold=0.098):
    """Gain of the shaft: it grinds from each turn on, dies down, and rests a moment before the next."""
    rest_before_s, rest_s, rest_db = 0.024, 0.0059, -10.5  # how early, how long, how deep
    t = np.arange(N) / SR
    resting = sum(np.exp(-((t - s + rest_before_s) / rest_s) ** 4) for s, length, db in TURNS)
    grinds = [(s - .02, hold, 0) for s, length, db in TURNS]
    return strokes(grinds, attack=0.0046, release_db_per_s=78) * amp(rest_db * resting)


def working(attack=0.017):
    """Gain that opens when the screwdriver sets to work, and stays open."""
    start_s = 6.82
    return np.clip((np.arange(N) / SR - start_s) / attack, 0, 1)


def background(hiss_db=-60.0):
    """Sine tones make mains hum, and a hum two octaves higher that sounds once the screwdriver starts; noise
    makes murmur, hiss, swishes."""
    # mains hum, fundamental first: pitch_hz, level_db (relative)
    hum = [(50, -40), (100, -49.5), (200, -66.5), (250, -68.5), (350, -73)]
    # the mains hum steps from level to level: start_s, fundamental_db, overtones_db (added to the hum's levels)
    hum_steps = [(0, 2.5, 6.5), (.9, -11.5, -18), (3.02, -5.5, -20), (3.81, 1, 2), (6.81, -14.5, -19)]
    # the higher hum: pitch_hz, level_db (relative)
    high_hum = [(199.6, -41.5), (399.2, -50.5), (599, -57)]
    # soft swishes as the arms move: start_s, length_s, level_db
    swish_moves = [(-.1, 1.1, -46.5), (1.5, 0.66, -53), (2.2, 0.072, -49), (2.4, 0.697, -55.5),
                   (2.7, 0.34, -51), (3.15, 1.88, -55), (4.56, 0.13, -47.5), (5.12, 0.16, -47.5),
                   (5.3, .28, -52)]
    # tone of the swishes: pitch_hz, level_db (relative)
    swish_tone = [(60, -35), (180, -15), (400, -13), (700, -11.5), (1050, -7.5), (1800, -14.5),
                  (3700, -13.5), (4300, -17), (7000, -24.5), (12000, -29), (16000, -37)]
    # tone of the room hiss: pitch_hz, level_db (relative)
    hiss_tone = [(60, -27), (180, -11), (420, -7), (700, -9.5), (1100, -6), (1800, -17), (3700, -19),
                 (7000, -27), (12000, -30.5), (16000, -37)]
    # tone of the room's low murmur: pitch_hz, level_db (relative)
    murmur_tone = [(30, 6), (90, -2.5), (200, -10.5), (330, -8), (550, -12), (1200, -36)]
    murmur_db, high_hum_db = -57, 0.5

    t = np.arange(N) / SR
    starts, *steps_db = np.transpose(hum_steps)
    step = np.searchsorted(starts[1:], t)
    # each step is smoothed over 1500 samples
    mains, buzz = (uniform_filter1d(amp(db)[step], size=1500) for db in steps_db)

    def tones(lines):
        """Steady sines at random phases."""
        return np.sqrt(2) * sum(amp(db) * np.sin(2 * np.pi * (hz * t + rng.random())) for hz, db in lines)

    swishing = strokes(swish_moves, attack=0.025, release_db_per_s=100)
    swishes = unit(coloured(rng.standard_normal(N), swish_tone)) * swishing
    hiss = amp(hiss_db) * unit(coloured(rng.standard_normal(N), hiss_tone))
    murmur = amp(murmur_db) * unit(coloured(rng.standard_normal(N), murmur_tone))
    low = mains * tones(hum[:1]) + buzz * amp(0.29 * wobble(4)) * tones(hum[1:])
    high = amp(high_hum_db) * working() * amp(1.4 * wobble(12)) * tones(high_hum)
    return murmur + low + high + hiss + swishes


def spread(x, side):
    """A faint, smeared difference between left and right, made with a dense ring."""
    shaped = filtered(x, lambda hz: amp(along(side, hz)))
    return signal.fftconvolve(shaped, ring(0.1, direct=0))[:N]


def scene(side_hiss_db=-70):
    """Everything is central, with a faint stereo spread and hiss of opposite sign in the two ears."""
    # stereo spread of each group, side against centre: pitch_hz, level_db
    wire_spread = [(60, -17.5), (240, -26.5), (950, -43.5), (3770, -30.5), (15000, -18)]
    case_spread = [(60, -42.5), (240, -44.5), (950, -32.5), (3770, -22), (15000, -7)]
    tool_spread = [(60, -64), (240, -42), (950, -29), (3770, -87), (15000, -42)]
    air_spread = [(100, -62), (200, -32), (1000, -23.5), (4000, -19.5), (12000, -18.5)]
    wires = scrapes() + clacks() + squeaks() + singing()
    case = knocks() + taps() + rocking()
    tool = screwdriver()
    air = background()
    mid = wires + case + tool + air
    side = spread(wires, wire_spread) + spread(case, case_spread)
    side = side + spread(tool, tool_spread) + spread(air, air_spread)
    side = side + amp(side_hiss_db) * rng.standard_normal(N)
    return np.array([mid + side, mid - side])


def record(dry):
    """Clip at full scale, then cut steeply above the top frequency."""
    top_hz = 16000
    return filtered(np.clip(dry, -1, 1), lambda hz: 1 / (1 + (hz / top_hz) ** 120))


dry = scene()
out = record(dry)
wav_record(out)
```